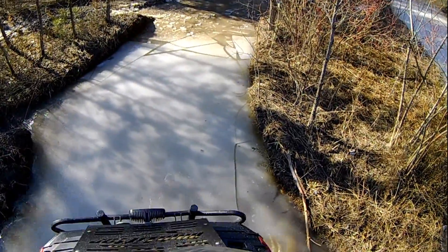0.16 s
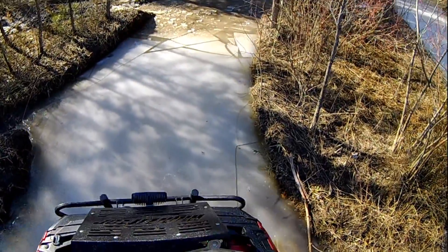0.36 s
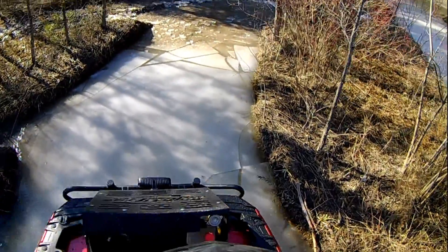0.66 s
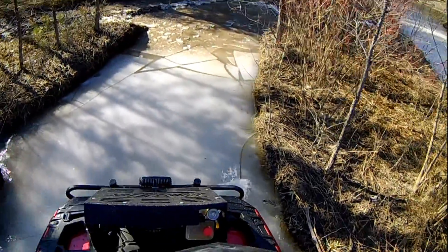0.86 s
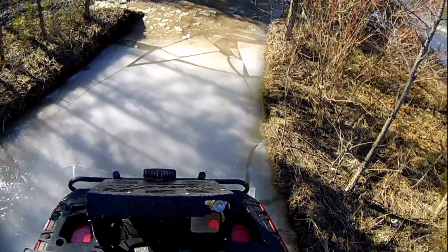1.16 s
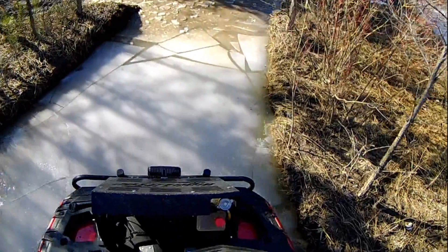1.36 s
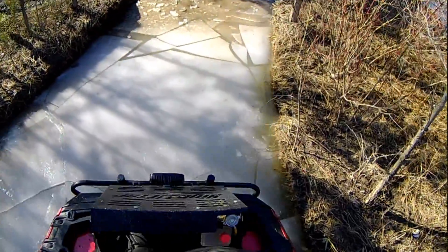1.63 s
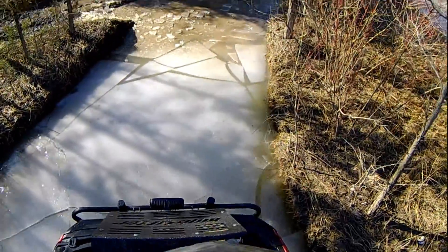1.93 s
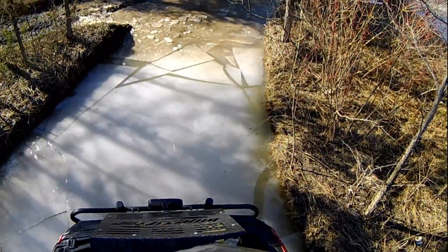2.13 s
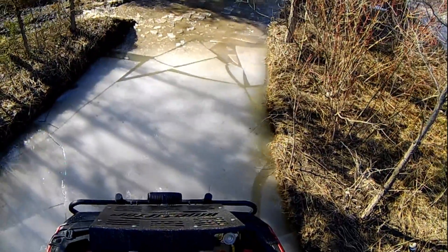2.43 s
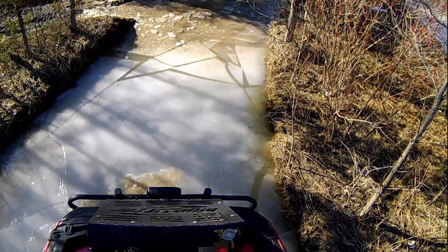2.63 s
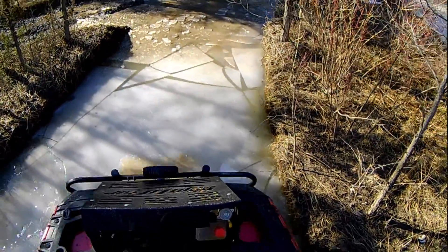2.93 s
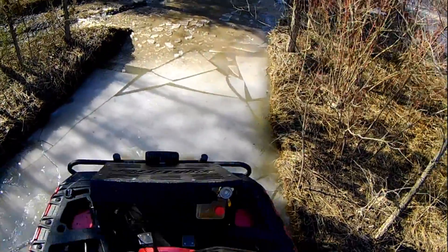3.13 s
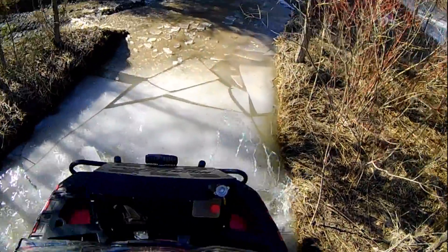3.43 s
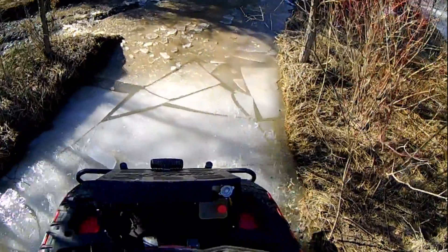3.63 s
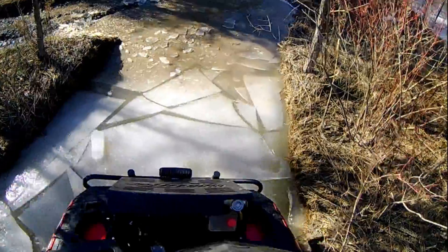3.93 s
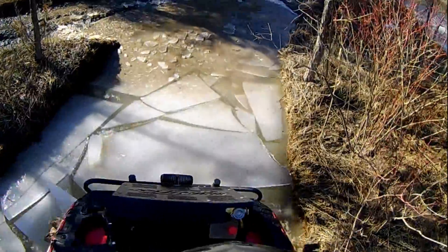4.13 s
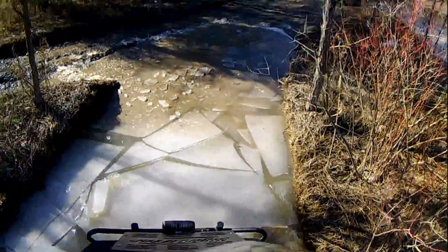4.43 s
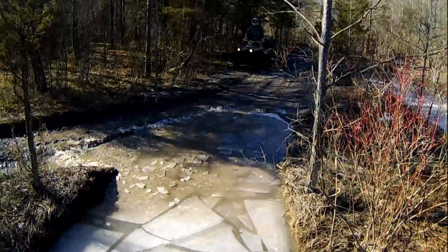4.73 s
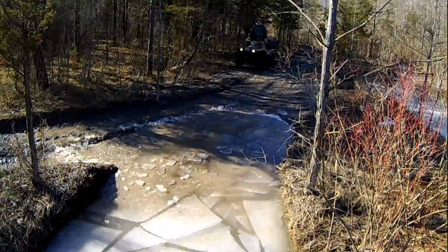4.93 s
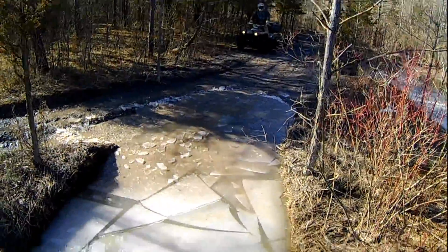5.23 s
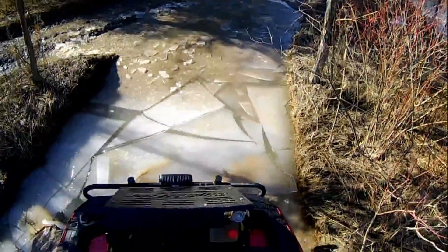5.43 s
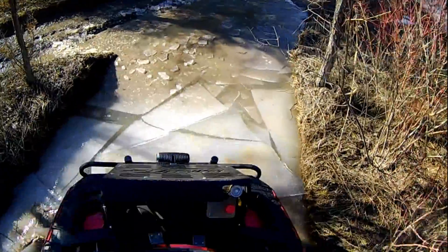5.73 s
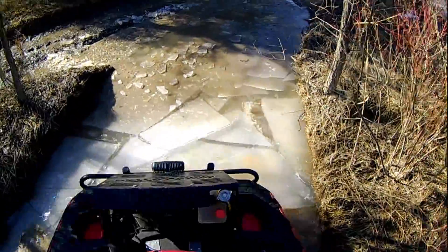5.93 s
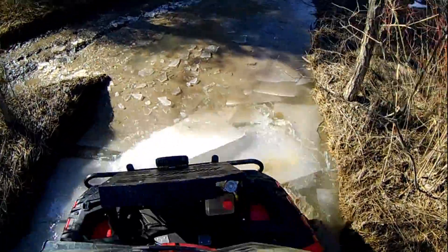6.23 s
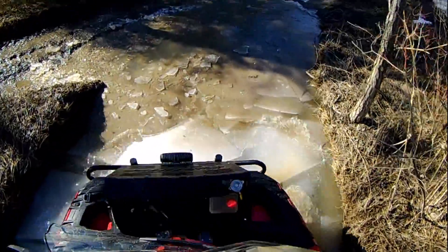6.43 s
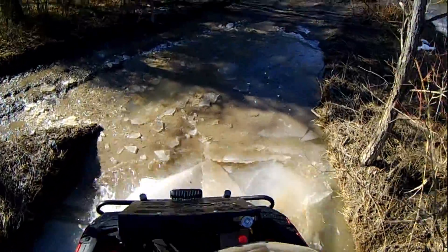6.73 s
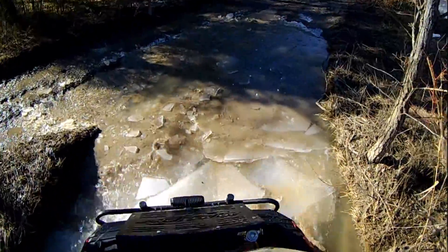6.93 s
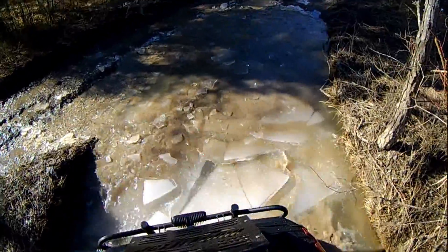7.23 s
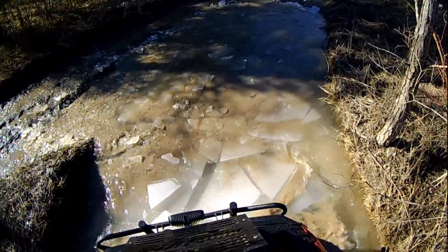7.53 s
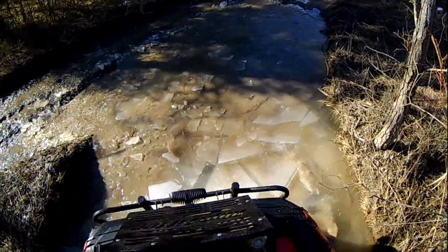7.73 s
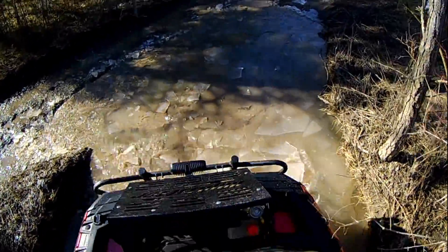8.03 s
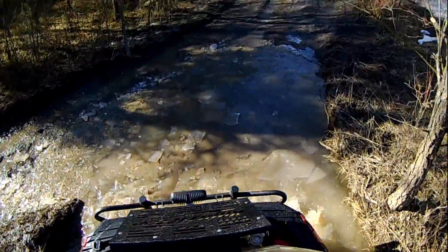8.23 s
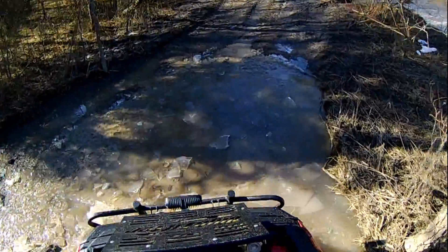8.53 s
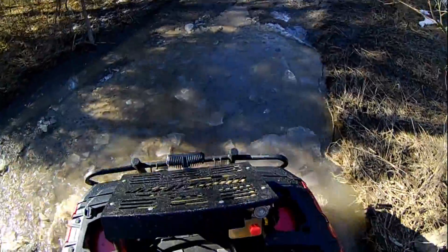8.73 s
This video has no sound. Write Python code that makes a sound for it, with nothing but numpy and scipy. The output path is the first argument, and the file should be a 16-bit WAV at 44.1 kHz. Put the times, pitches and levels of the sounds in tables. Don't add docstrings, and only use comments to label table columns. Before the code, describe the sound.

A quad bike engine revs and sags four times while wading through churning, gurgling water, ice slabs cracking against its hull, heard muffled and close.

```python
import sys
import numpy as np
from scipy import signal
from scipy.io import wavfile
from scipy.ndimage import uniform_filter1d

SR = 44100
rng = np.random.default_rng(int(sys.argv[2]) if len(sys.argv) > 2 else 0)


def ratio_of_db(decibels):
    return 10 ** (np.asarray(decibels, float) / 20)


def persist_wave(psi):
    counts = np.round(np.clip(psi, -1, 1) * 32767).astype(np.int16)
    wavfile.write(sys.argv[1], SR, np.atleast_2d(counts).T)


N = 391166
t = np.arange(N) / SR
COARSE = t[::256]
KEPT = []


def curves(rows):
    s, *columns = np.transpose(rows)
    return [np.interp(t, s, c) for c in columns]


def swells(rows, edge=4):
    total = sum(height * np.exp(-abs(2 * (COARSE - s) / length) ** edge) for s, length, height in rows)
    return np.interp(t, COARSE, total)


def drift(at):
    return np.interp(at * 8, np.arange(80), rng.standard_normal(80))


def wander(spread_db):
    return ratio_of_db(spread_db * drift(t))


def lagged(x, start, lag_s):
    keep = np.exp(-1 / (lag_s * SR))
    return start + signal.lfilter([1 - keep], [1, -keep], x - start)


def evened(x, span_s=0.4):
    power = uniform_filter1d(x ** 2, int(span_s * SR))
    power = uniform_filter1d(power, int(span_s * SR / 2))
    return x / np.sqrt(abs(power) + 1e-20)


def ring(x, modes):
    out = np.zeros(len(x))
    for k, (hz, width_hz, db) in enumerate(modes):
        r = np.exp(-np.pi * width_hz * 1.5 / SR)
        pole = r * np.exp(2j * np.pi * hz / SR)
        mode = signal.lfilter([(1 - r) ** 2], [1, -2 * pole, pole ** 2], x).real
        out += (-1) ** k * ratio_of_db(db) * mode
    return out


def noise(colour, patchy_db):
    hz = np.fft.rfftfreq(512, 1 / SR)
    a, b, patches = rng.standard_normal((N // 128 + 5, 257, 3)).T
    patches = uniform_filter1d(uniform_filter1d(patches, 3, axis=0), 10, axis=1)
    f, db = np.transpose(colour)
    level_db = np.interp(np.log(hz + 1), np.log(f + 1), db, left=-120, right=-120)[:, None]
    z = (a + 1j * b) * ratio_of_db(level_db + patchy_db * patches / patches.std())
    return evened(signal.istft(z, nperseg=512, noverlap=384)[1][:N])


# time_s, engine_cycles_hz
DEMAND = [(0, 23.33), (.597, 24.6), (.758, 21.63), (.851, 15.93), (1.669, 9.191), (2.263, 12.115),
          (2.555, 28.088), (2.864, 31.833), (3.266, 16.788), (3.826, 8.65), (4.238, 11.116), (4.741, 9.74),
          (5.105, 25.142), (5.393, 24.431), (5.766, 25.718), (5.906, 29.551), (6.005, 22.464),
          (6.156, 16.008), (6.896, 7.317), (7.436, 26.307), (7.792, 25.854), (8.87, 37.049)]


def demand():
    return curves(DEMAND)[0]


# middle_s, length_s, speed_percent
WAVERS = [(.04, .1, -.6), (.47, .14, .6), (.63, .09, -.4), (1.72, .2, -2), (1.97, .25, 2), (2.56, .08, 1.2),
          (3, .12, -.4), (3.45, .4, -.8), (4.2, .45, -2), (4.66, .42, 1.6), (5.38, .16, -.4),
          (5.7, .12, .55), (5.84, .08, -.4), (5.94, .08, .5), (6.1, .14, -1), (6.72, .45, -1.8),
          (7.05, .2, 3), (7.4, .25, .35), (8, .08, -.3), (8.27, .16, -.4), (8.54, .18, .65), (8.76, .1, -.5),
          (8.87, .14, -1.1)]


def flywheel():
    return lagged(demand(), 20.55, lag_s=.195) * (1 + swells(WAVERS, edge=2) / 100)


def speed():
    if not KEPT:
        KEPT.append(flywheel())
    return KEPT[0]


def cycles():
    return np.cumsum(speed()) / SR


def surge():
    return np.maximum(demand() - speed(), 0)


def throttle():
    open_hz, open_span_hz, shut_hz, shut_span_hz = 11, 11, 2.2, 2
    coast = np.clip((speed() - demand() - shut_hz) / shut_span_hz, 0, 1)
    pull = np.clip((demand() - open_hz) / open_span_hz, 0, 1) * (1 - coast)
    return pull, coast


def load():
    pull = throttle()[0]
    surge_hz = 7.3
    return np.clip(pull - surge() / surge_hz, .1 + .3 * pull, 1)


# time_s, effort_db, clear_db_per_octave
EFFORT = [(0, -39, -0.5), (.7, -36.5, -1), (.95, -39.5, 3), (1.7, -42, 3.5), (2.25, -41, 5),
          (2.55, -35.5, 1.5), (3.2, -37, 4), (3.65, -37.5, 2.5), (4.7, -41.5, 5.5), (5.2, -32.5, 2),
          (5.9, -31.5, -3), (6.15, -36, 3), (6.85, -38.5, 2.5), (7.3, -33.5, 4), (7.6, -32.5, 3),
          (8.3, -32.5, 3), (8.6, -34.5, 2.5), (8.87, -37.5, 2.5)]
MEAN_DB, PIVOT_HZ = -38, 110


def effort():
    effort_db, clear_db = curves(EFFORT)
    return effort_db - MEAN_DB, clear_db


# mean_level_db, effort_share, open_throttle_db, speed_db_per_10_hz, centre_hz, surge_db_per_hz
LAYERS = dict(frame=(-44.5, 0.16, 3, 1.8, 106, 0.2), low=(-43, 0.34, -3.5, -3.5, 110.5, 1.28),
          high=(-53, 0.05, -5.5, 4.5, 247, 1.42), panel=(-55.5, 0.6, -2, 7.5, 298.5, 0.98),
          airbox=(-64.5, 2.4, 4, 5.5, 214, 0.58))


def layer_db(name):
    db, share, open_db, speed_db, hz, surge_db = LAYERS[name]
    effort_db, clear_db = effort()
    db = db + share * effort_db + open_db * throttle()[0]
    db = db + speed_db * (speed() / 10 - 2) + surge_db * surge()
    return db + clear_db * np.log2(hz / PIVOT_HZ)


# start_s, boom_hz, boom_db, airbox_db, frame_db
REVS = [
    (0, 251, 11, 2, 0),
    (1.6, 246, 6, -1.5, -1),
    (4.2, 221, 13.5, -7, 0.5),
    (6.9, 215.4, 13, -12.5, -2),
    (8.45, 225, 16, -13.5, 0.5),
]


def by_rev(columns, at=t):
    now = np.searchsorted(np.transpose(REVS)[0], COARSE, "right") - 1
    blended = [uniform_filter1d(np.asarray(c, float)[now], size=43) for c in columns]
    return [np.interp(at, COARSE, c) for c in blended]


def rev():
    return by_rev(np.transpose(REVS)[1:])


# middle_s, length_s, level_db
SHUDDERS = [(.12, 0.71, 10), (.75, 0.22, 1.5), (2.47, 0.2, 8), (2.67, 0.18, 8), (3.8, 0.11, 5),
            (4.3, 0.41, 2), (5.086, 0.17, 4.5), (5.75, 0.23, 4.5), (6.196, 0.3, 8), (7.284, 0.22, 8.5),
            (7.573, 0.31, 9.5), (7.84, 0.083, 8), (7.98, 0.081, 9), (8.65, 0.1, 5)]


def shudder_db():
    return swells(SHUDDERS)


def hum():
    hum_hz, hum_db, hum_share = 44.55, -3.5, 1.92
    db = layer_db("frame") + rev()[3] + hum_db + hum_share * shudder_db()
    return ratio_of_db(db) * np.sin(2 * np.pi * hum_hz * t)


SECOND_FIRING, FIRING_GAP = .83, .383


def lull():
    depth = np.clip((19 - speed()) / 9, .25, .88)
    depth = depth * np.clip(.85 + (demand() - speed()) / 6, .5, 1)
    distance = (cycles() - SECOND_FIRING - .24 + .5) % 1 - .5
    return 1 - depth * np.exp(-(distance / .09) ** 2)


# cycle_rate_multiple, idle_db, pulling_db, coasting_db
ORDERS_DB = [(1, -61, -39.5, -36), (2, -50, -41, -44), (3, -60.5, -64, -41), (4, -56, -61, -65),
             (5, -46, -37.5, -40.5), (6, -75, -44, -59), (7, -50, -51, -64), (8, -48.5, -45.5, -51),
             (9, -63, -82, -86), (10, -51.5, -82, -76), (11, -62, -94, -68)]
# pitch_hz, level_db
BODY = [(24, -37), (31, 3), (43, -17), (55, -8), (68, 0), (140, 0), (170, -12), (300, -18.5)]
# pitch_hz, width_hz, level_db
FRAME = [(42.6, 10.8, -0.5), (27.8, 11, -9.5)]


def tones():
    (pull, coast), (effort_db, clear_db), turns = throttle(), effort(), cycles()
    f, body_db = np.transpose(BODY)
    rate, shake_db, out = speed(), shudder_db(), np.zeros(N)
    boom_hz, boom_db = rev()[:2]
    boom_width_hz, shake_width_hz, shake_share = 44.8, 14, -1.2
    for k, (_, idle_db, pull_db, coast_db) in enumerate(ORDERS_DB, 1):
        hz = k * rate
        db = idle_db + (pull_db - idle_db) * pull + (coast_db - idle_db) * coast + 0.81 * effort_db
        db += np.interp(np.log(hz), np.log(f), body_db)
        db += clear_db * np.maximum(np.log2(hz / PIVOT_HZ), 0)
        db += shake_share * shake_db * np.exp(-((hz - FRAME[0][0]) / shake_width_hz) ** 2)
        db += pull * boom_db * np.exp(-((hz - boom_hz) / boom_width_hz) ** 2)
        pair = np.angle(1 + 0.63 * np.exp(2j * np.pi * k * FIRING_GAP))
        wave = np.cos(2 * np.pi * k * (turns - SECOND_FIRING) + pair)
        out += ratio_of_db(db) * wander(0.5) * np.sqrt(2) * wave
    return out


def firings(scatter_db, jitter_s, first, gulp):
    intake_lead, lag_s = .195, .006
    out, early, turns = np.zeros(N), SECOND_FIRING - FIRING_GAP, cycles()
    blows = ((early, first), (SECOND_FIRING, 1))
    gulps = ((early - intake_lead, gulp), (SECOND_FIRING - intake_lead, gulp))
    for place, weight in blows + gulps:
        s = np.interp(np.arange(int(turns[-1])) + place, turns, t) - lag_s
        luck = rng.standard_normal((len(s), 2))
        at = np.clip((s + jitter_s * luck[:, 0]) * SR, 0, N - 1).astype(int)
        out[at] += weight * ratio_of_db(scatter_db * luck[:, 1])
    return out


def throb(fire, decay_s):
    puff = signal.lfilter([1], [1, -np.exp(-1 / (decay_s * SR))], fire)
    puff = uniform_filter1d(puff, 200)
    return evened(puff - uniform_filter1d(puff, SR // 5))


# pitch_hz, width_hz, level_db
PIPE_LOW = [(85, 23.4, 1.5), (135.7, 22.1, -2.5), (141.8, 19.7, -8)]
# pitch_hz, width_hz, level_db
PIPE_HIGH = [(192.8, 51.4, -1.5), (258.4, 41, 1), (271.5, 51, 0)]


def exhaust(fire):
    rough = np.clip((speed() - 10.5) / 16, 0, .65)
    gas = rng.standard_normal(N) * ratio_of_db(0.51 * throb(fire, decay_s=0.093))
    frame_db = layer_db("frame") + rev()[3] + .15 * shudder_db()
    layers = ((FRAME, frame_db), (PIPE_LOW, layer_db("low")), (PIPE_HIGH, layer_db("high")))
    out = np.zeros(N)
    for modes, db in layers:
        clean, rush = evened(ring(fire, modes)), evened(ring(gas, modes))
        out += ratio_of_db(db) * (np.sqrt(1 - rough) * clean + np.sqrt(rough) * rush)
    return out


# rev_1_db, rev_2_db, rev_3_db, rev_4_db
WHINE_DB = [(-69, -62, -62, -64.0), (-51, -53, -54.5, -56.5), (-49.0, -53.5, -57, -60),
            (-59.5, -65.5, -75.5, -66), (-55.5, -68, -59.5, -61), (-73, -65, -66, -57.5),
            (-54, -68, -51, -58.5), (-50, -61.5, -56, -50), (-72, -75, -88, -60), (-65, -58.5, -71, -51.5),
            (-58, -63.5, -61.5, -64), (-81, -65, -66.5, -64), (-57.5, -58, -52.5, -55.5),
            (-62, -70, -58.5, -66), (-63, -69, -72, -59.0), (-73, -52.5, -61, -55.5), (-80, -62, -67, -59),
            (-62, -59.0, -53.5, -49.5), (-69, -61, -61, -62.0), (-64, -76, -71.0, -67.0),
            (-70, -74, -67, -58), (-58, -72, -54, -59), (-74, -70, -72, -68), (-77, -68, -59.5, -78),
            (-86, -71, -67, -56), (-60.5, -68, -62.5, -55.5), (-60.5, -69, -62, -65), (-61, -65, -74, -77),
            (-66, -71, -63, -61), (-78.0, -70.0, -70, -68), (-85, -71, -80, -59), (-76, -70, -73.0, -76),
            (-78, -83, -71.0, -71), (-77, -67, -65, -74), (-74, -66, -68, -76), (-67, -66.5, -67, -85),
            (-79, -77, -75, -80), (-97, -68, -83, -79), (-67, -77, -70, -77)]
WHINE_TOP_DB = [-67, -75, -63, -69, -65, -56, -54.5, -59.5, -74, -57, -62, -70, -50.5, -55, -58, -53.5, -52,
                -58, -63, -67, -57, -70, -62, -65, -68, -59, -59, -70, -69, -66, -63, -79, -80, -66.5, -66,
                -71, -72, -74, -73]
# pitch_hz, level_db
CASING = [(285, 2), (340, -11), (430, -7), (470, 2.5), (510, 0), (560, 3.5), (650, 1.5), (735, -10),
          (800, 2.5), (860, -8.5), (990, 5.5), (1130, -1), (1220, 0.5), (1320, 9), (1600, 2)]


def whine():
    turns, rate, out = cycles(), speed()[::256], np.zeros(N)
    f, casing_db = np.transpose(CASING)
    levels = by_rev(np.column_stack([WHINE_DB, WHINE_TOP_DB]), COARSE)
    for k, db in zip(range(9, 48), levels):
        db = db + 1.5 + np.interp(k * rate, f, casing_db) + 1.5 * drift(COARSE)
        wave = np.cos(2 * np.pi * (k * turns + rng.random()))
        out += np.interp(t, COARSE, ratio_of_db(db)) * wave
    return np.sqrt(2) * load() * out


def water_db():
    return -55 + 0.41 * (lagged(speed(), 23.0, lag_s=0.23) - 20) + 0.53 * effort()[0]


# pitch_hz, level_db
CHURN = [(180, -31), (300, 11.5), (413, -22), (464, 14), (527, -14), (639, 2.5), (733, -41.5), (799, -1),
         (1130, -10), (1240, -5), (1420, -10), (1580, -7), (1970, -15.5), (2440, -22.5), (3050, -36.5),
         (3960, -71), (6710, -120)]


def churn(gate):
    return evened(noise(CHURN, patchy_db=2.5) * gate ** .22) * ratio_of_db(water_db() + 5 - 4 * load())


def gurgles():
    per_s, gurgle_db = 53, -9
    out, u = np.zeros(N), t[:700]
    for hz in np.geomspace(550, 2100, num=12):
        sizes_db = 6.1 * np.minimum(rng.exponential(1, N), 3)
        train = (rng.random(N) < per_s / 12 / SR) * ratio_of_db(sizes_db)
        bubble = 600 / hz * np.sin(2 * np.pi * hz * u * (1 + 6.2 * u)) * np.hanning(len(u)) ** 2
        out += signal.oaconvolve(train, bubble)[:N]
    return out / out.std() * ratio_of_db(water_db() + gurgle_db - 4.8 * load())


# pitch_hz, width_hz, level_db
PANELS = [(463.3, 27.4, 6), (540, 77, -18.5), (626, 68, 3.5), (777, 32, -2.5), (817, 88, -3),
          (977.6, 15, 3), (1080, 38, -3.5)]
# pitch_hz, width_hz, level_db
AIRBOX = [(1234, 43, 15.5), (1550, 65, 4.5), (2410, 44, -14.5), (2823, 34, -14)]


def rattle(fire, gate):
    airbox_db = layer_db("airbox") + rev()[2]
    # modes, level dB, share of knock, share given up to the whine, lead s
    parts = ((PANELS, layer_db("panel") - 2.5, .32, .66, 0), (AIRBOX, airbox_db, .9, 0, .003))
    out = np.zeros(N)
    for modes, db, blow, sung, lead_s in parts:
        early = np.roll(fire, -int(lead_s * SR))
        knock = evened(ring(early, modes)) * np.sqrt(blow)
        loose = evened(ring(rng.standard_normal(N) * gate, modes)) * np.sqrt(1 - blow - sung * load())
        out += ratio_of_db(db) * (knock + loose)
    return out


def clatter(fire):
    gate = ratio_of_db(2.5 * throb(fire, decay_s=.025))
    return churn(gate) + whine() + gurgles() + rattle(fire, gate)


# pitch_hz, width_hz, level_db
SURGE_PANELS = [(469, 42, -3.5), (625, 58, 2.5)]
# pitch_hz, width_hz, level_db
BRACKET = [(2395, 38, 0)]


def panel_bark(fire):
    bark_db, bark_surge_hz, bracket_db = -52.5, 8, -21.5
    bark = ratio_of_db(bark_db) * np.clip(surge() / bark_surge_hz, 0, 1) * evened(ring(fire, SURGE_PANELS))
    buzz_db = layer_db("airbox") + rev()[2] + bracket_db
    return bark + ratio_of_db(buzz_db) * wander(4) * evened(ring(fire, BRACKET))


# pitch_hz, level_db
HISS_COLOUR = [(2600, -24), (3300, -2.5), (3700, 0.5), (4500, -3.5), (6000, -4.5), (7000, -2.5),
               (12000, -1.5), (13500, 1), (14200, 1.5), (14350, -49)]
# pitch_hz, level_db
HISS_TOP = [(14250, -40), (14350, 0), (15000, 0)]
# middle_s, length_s, level_db
TOP_GAPS = [(.96, .28, -30), (1.38, .48, -30), (2.95, .14, -12), (3.56, .54, -30), (7.4, 3.5, -30)]
# middle_s, length_s, level_db
HISS_GUSTS = [(.05, 0.091, 3.5), (.39, 0.038, 5), (.7, 0.046, 2), (1.8, 0.055, 2), (2.3, 0.038, 5),
              (2.74, 0.069, 3), (3.2, .12, 4), (4.2, .05, 3), (5.4, 0.14, 1.5), (5.8, 0.14, 3.5), (6.25, .06, 1),
              (7.15, 0.075, 2), (7.6, 0.38, 2), (7.85, .07, 4.5), (8, 0.12, 2.5), (8.87, 0.12, 1)]


def hiss(engine):
    block_s = 1024 / 48000
    block = (t / block_s).astype(int)
    flicker, size = rng.standard_normal((block[-1] + 1, 2)).T
    pulse = np.exp(-abs((t + 0.0017) % block_s - .002) / 0.00073)
    tick = 1 + 2.0 * np.clip(abs(size[block]), 0, 1.3) * pulse
    power = abs(uniform_filter1d(engine ** 2, int(0.086 * SR)))
    engine_db = 10 * np.log10(power + 1e-12)
    db = -81 + 0.69 * (engine_db - MEAN_DB) + swells(HISS_GUSTS) + 1.2 * np.clip(flicker, -2, 2)[block]
    top = ratio_of_db(swells(TOP_GAPS, edge=12) - 10.0) * noise(HISS_TOP, patchy_db=3.0)
    return ratio_of_db(db) * tick * (noise(HISS_COLOUR, patchy_db=1.5) + top)


# start_s, peak_db, pitch_hz
SQUEAKS = [(0.3845, -68, 14400), (0.7008, -65, 14800), (1.5, -70, 13300), (1.8003, -62, 14800),
           (2.1495, -67, 14800), (2.4508, -71, 14700), (3.9055, -67, 14800), (1.143, -77, 3900),
           (1.35, -83, 3630), (1.385, -85, 3650), (1.425, -85, 3600), (1.448, -85, 3580)]


def squeaks():
    out, u = np.zeros(N), t[:1200]
    for s, db, hz in SQUEAKS:
        part = out[round(s * SR):][:len(u)]
        squeak = ratio_of_db(db) * np.sin(2 * np.pi * hz * u) * np.hanning(len(u))
        part += squeak[:len(part)]
    return out


# start_s, peak_db, pitch_hz, t60_s
ICE = [(1.139, -40, 1100, 0.056), (1.155, -32, 1070, 0.12), (1.188, -34, 1080, 0.1),
       (1.486, -42.5, 1070, 0.24), (2.048, -46, 975, 0.087), (3.105, -44, 1300, 0.056),
       (3.169, -43, 1400, 0.066), (3.208, -41, 1060, .06), (3.242, -39, 1200, 0.042),
       (3.333, -51, 810, .06), (3.354, -37, 1030, 0.087), (3.495, -40, 850, .06), (3.536, -39, 1200, 0.077),
       (3.75, -42, 1080, 0.046), (5.7855, -32.5, 1080, 0.096), (6.105, -49, 872, .07),
       (6.157, -37, 845, 0.12), (6.267, -37, 820, 0.089), (6.345, -46, 1020, 0.11),
       (6.403, -35.5, 810, 0.099), (6.502, -38, 797, 0.053), (6.591, -35.5, 1070, 0.072),
       (6.688, -41, 1030, .05), (8.35, -42, 1160, 0.079), (8.487, -44, 1080, .06)]


def ice():
    out, u = np.zeros(N), t[:SR // 6]
    for s, db, hz, t60 in ICE:
        burst = rng.standard_normal(len(u)) * ratio_of_db(-60 * u / t60) * (1 - np.exp(-u / .002))
        modes = [(hz, 150, 0), (hz * 1.45, 250, -3), (hz * 0.74, 200, -3),
                 (hz * 1.99, 300, -15), (hz * 2.63, 250, -30)]
        burst = ring(burst, modes)
        part = out[round((s - .006) * SR):][:len(u)]
        part += ratio_of_db(db - 1.5) * (burst / abs(burst).max())[:len(part)]
    return out


# start_s, peak_db
PINGS = [(2.3585, -48), (2.387, -39.5), (2.4278, -39), (4.2346, -42), (4.3634, -42), (4.455, -37.5),
         (4.5126, -52), (4.552, -47), (4.7047, -61), (4.747, -50), (4.801, -44), (4.8373, -41),
         (4.8925, -41), (4.965, -41), (6.2627, -45), (6.6863, -44), (7.232, -46), (7.2993, -40.5),
         (7.162, -44), (7.194, -46), (7.362, -40), (4.174, -39), (2.125, -44), (2.285, -43), (2.316, -47)]


def pings():
    s, db = np.transpose(PINGS)
    blows, click, out = np.zeros(N), np.arange(2000) == 0, np.zeros(N)
    blows[(s * SR).astype(int)] = ratio_of_db(db - 5.0)
    for modes, part_db in ((AIRBOX, 0.5), (PANELS, -4.5)):
        out += ratio_of_db(part_db) * ring(blows, modes) / abs(ring(click, modes)).max()
    return out


def scene():
    shell = signal.ellip(6, .5, 40, 3080, fs=SR, output="sos")
    puffs = firings(scatter_db=1.5, jitter_s=0.00082, first=.85, gulp=.45)
    blows = firings(scatter_db=1.6, jitter_s=.00006, first=.8, gulp=0)
    engine = (hum() + tones() + exhaust(puffs)) * lull()
    engine += (clatter(blows) + panel_bark(blows)) * lull() ** (.28 + np.minimum(surge() / 8, .2))
    outside = signal.sosfilt(shell, engine + pings() + ice())
    return (outside + hiss(engine) + squeaks())[None]


def low_pass(x):
    return signal.sosfilt(signal.butter(12, 15030, fs=SR, output="sos"), x)


def record(dry):
    low_cut = signal.butter(1, 18, "highpass", fs=SR, output="sos")
    mix = signal.sosfilt(low_cut, dry)
    return low_pass(mix)


dry = scene()
out = record(dry)
persist_wave(out)
```